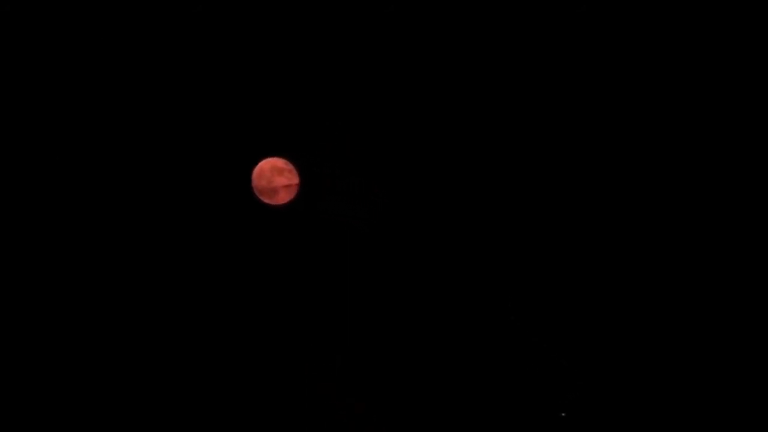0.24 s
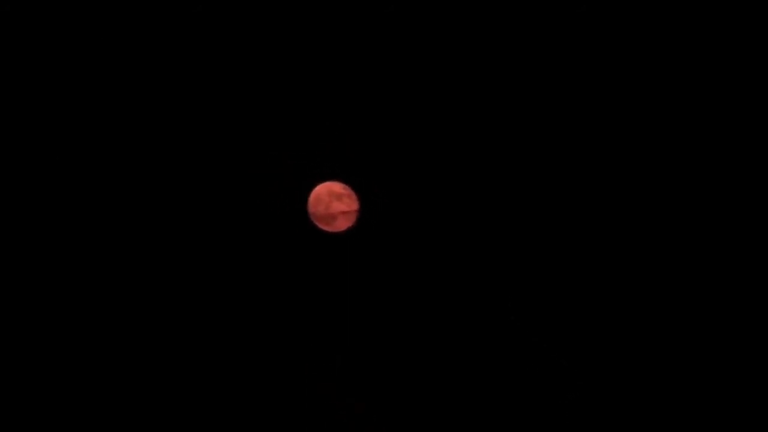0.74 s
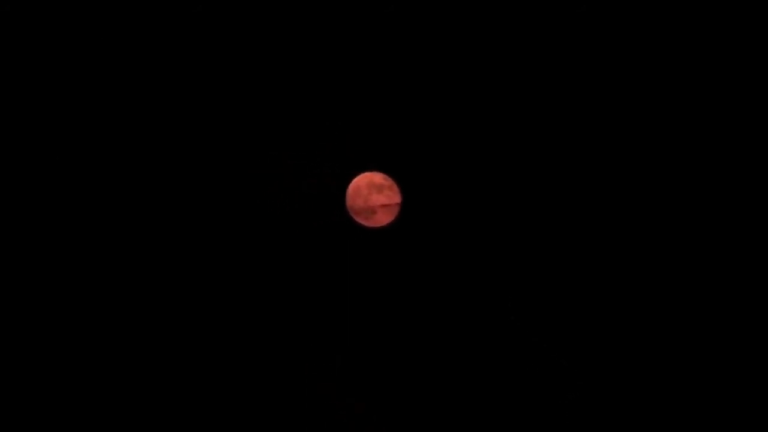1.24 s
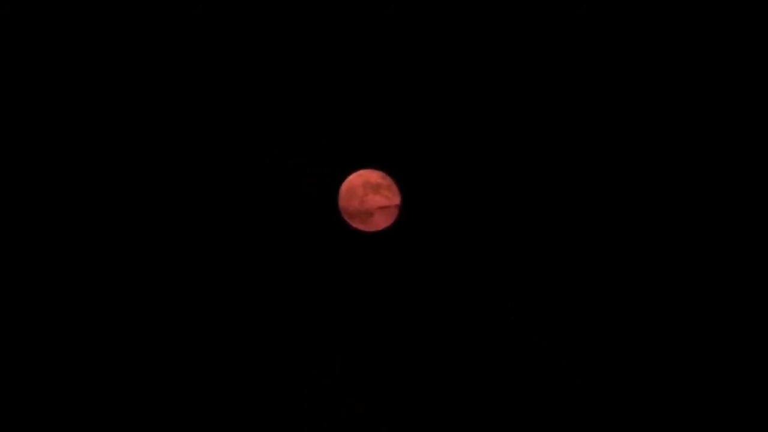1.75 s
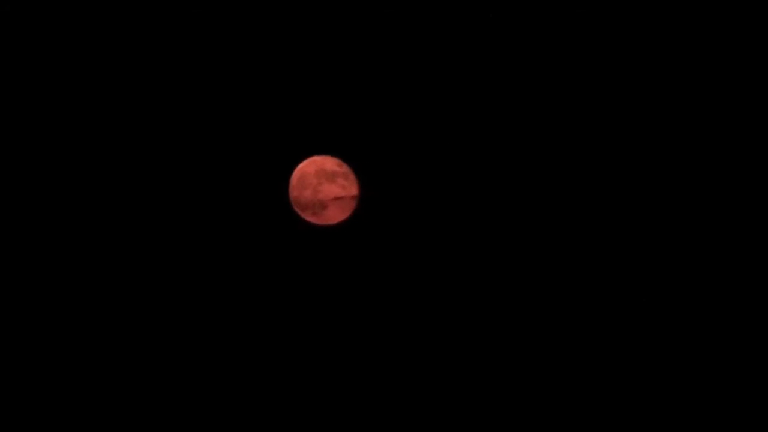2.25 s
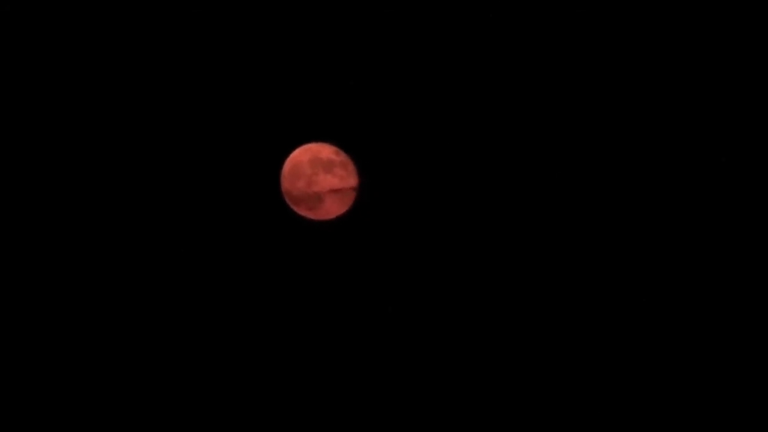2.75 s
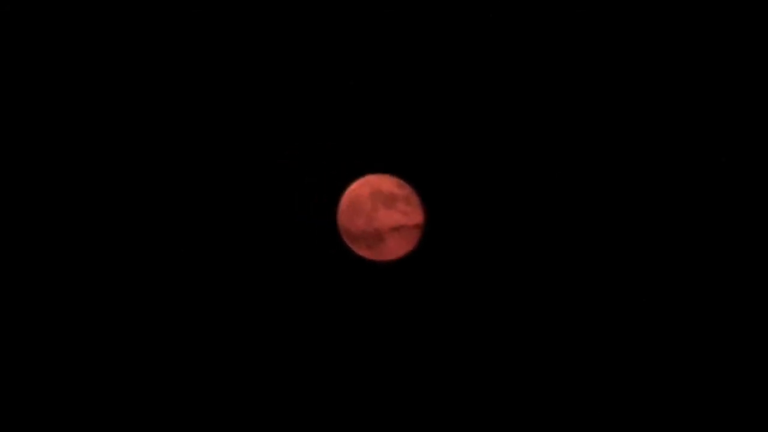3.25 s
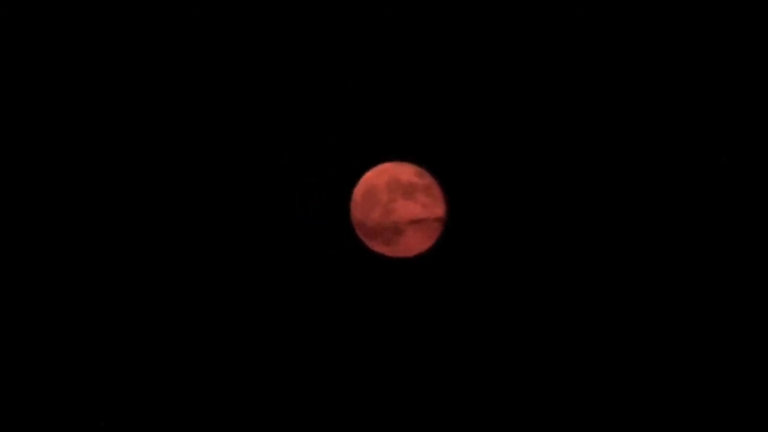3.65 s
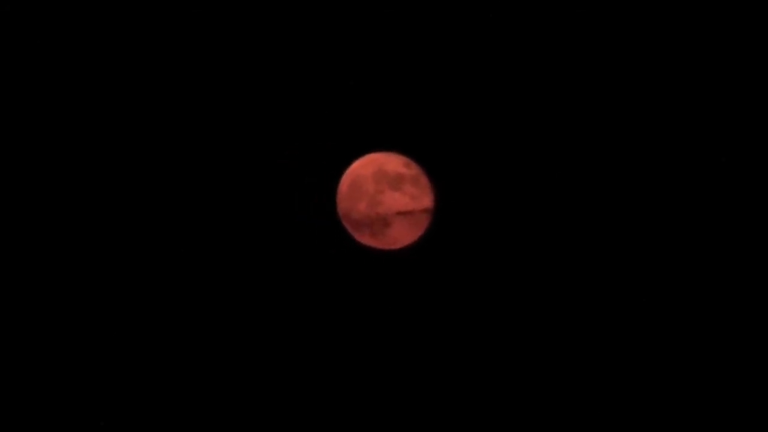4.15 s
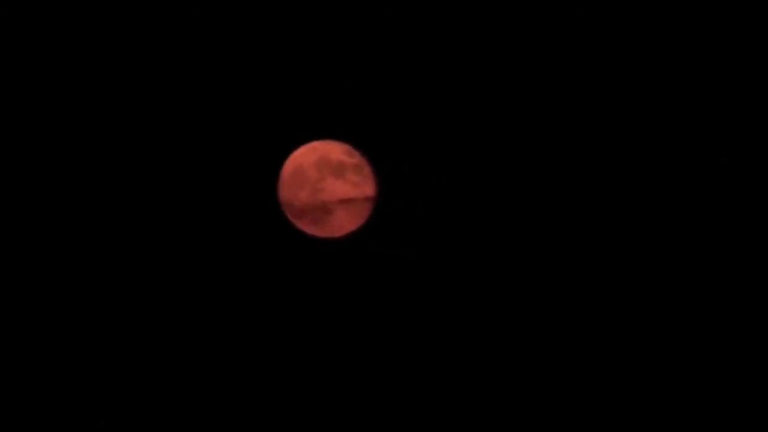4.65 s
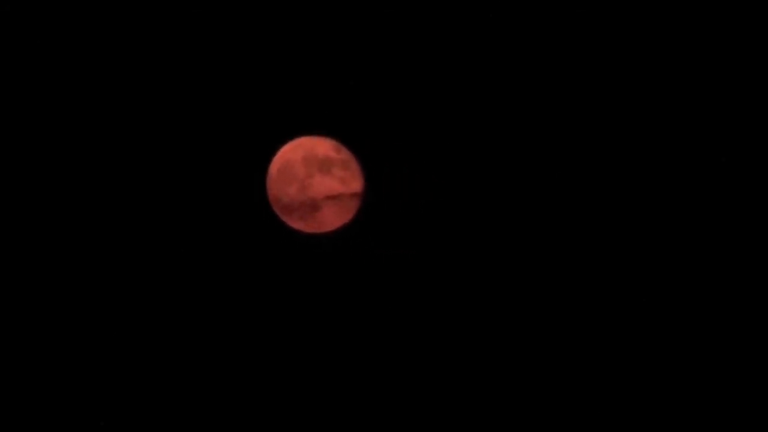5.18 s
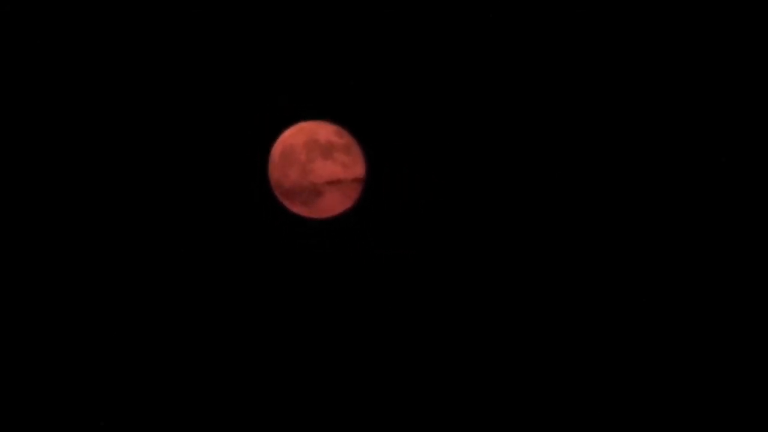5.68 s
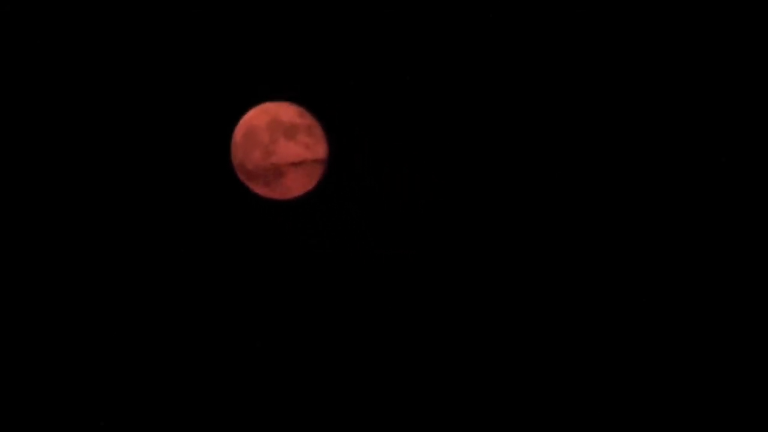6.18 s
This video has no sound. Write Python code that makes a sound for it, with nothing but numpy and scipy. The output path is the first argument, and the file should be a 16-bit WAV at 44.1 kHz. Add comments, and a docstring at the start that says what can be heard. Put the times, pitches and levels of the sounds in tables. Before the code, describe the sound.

Distant frogs chorus over a low motor hum and steady hiss by the water at night, with two sharp clicks close by near the end.

```python
"""A far chorus of frogs swells about once a second across quiet water at night. Nearer frogs rattle
in trains of chirps off to the right, and others croak low with ringing vocal sacs. A distant motor
drones in overtones of its firing rate, over a low rush of air and the hiss of the microphone pair.
Right at the microphones, small blows ring the camera's casing: it ticks faintly, then clicks twice."""
import sys
import numpy as np
from scipy import signal
from scipy.fft import rfft, irfft
from scipy.io import wavfile

SR = 44100
rng = np.random.default_rng(int(sys.argv[2]) if len(sys.argv) > 2 else 0)


def generate_wav(sig):
    """Save sig (samples, or channels by samples) to the path in sys.argv[1] as 16-bit PCM at SR."""
    pcm = np.round(np.clip(np.atleast_2d(sig).T, -1, 1) * 32767).astype(np.int16)
    wavfile.write(sys.argv[1], SR, pcm)


N = 283122
T = np.arange(N) / SR


def chorus(high_db=-61.5, low_db=-61.0, surge_s=0.28):
    """Far frogs across the water: a high band on the right and a weaker, low band swell together."""
    # the frogs egg each other on: (time of the peak [s], rise [dB])
    surges = [(0.05, 2.5), (1.0, 3.5), (2.2, 5), (3.22, 8), (4.65, 4.5), (5.8, 6.5)]
    swell_db = sum(db * bell(T - s, surge_s) for s, db in surges)
    low_swell_db = .25 * (swell_db - swell_db.mean())
    high = frog_crowd(hz=2000, spread=.055, pulse_s=.0028, count=1800)
    low = frog_crowd(hz=1190, spread=.04, pulse_s=.004, count=450)
    return panned(amp(high_db + swell_db) * high, left_db=-4) + amp(low_db + low_swell_db) * low


def frog_crowd(hz, spread, pulse_s, count, uneven_db=0.1):
    """Pips from many far frogs overlap, each with its own pitch, loudness and bearing."""
    mid, side = np.zeros((2, N))
    t = np.arange(-SR // 50, SR // 50) / SR
    for k, (delay, pitch, loudness, bearing) in enumerate(rng.standard_normal((count, 4))):
        pip_hz = hz * np.exp(spread * pitch)
        pip = amp(uneven_db * loudness) * bell(t, pulse_s) * np.sin(2 * np.pi * pip_hz * t)
        s = (k + delay / 2) / count * T[-1] + t[0]
        add(mid, s, pip)
        add(side, s, bearing * pip)
    return unit_rms(diffuse(mid, side))


def rattles(chirps_per_s=22.8, chirp_s=.0056, sweep_per_s=11.5, octave_db=-24):
    """Nearer frogs, right of the microphones: each rattle is a train of short upward chirps."""
    # (time of the first chirp [s], length [s], level [dB], pitch [Hz])
    calls = [(0.039, .285, -46.5, 1920), (1.464, .24, -48.5, 1892), (2.039, .29, -55, 1990),
             (3.006, .45, -54, 2002), (3.195, .42, -53.5, 1990), (5.217, .24, -45.5, 1960),
             (5.80, .33, -54, 1976)]
    out = np.zeros(N)
    for s, length, db, hz in calls:
        count = max(int(length * chirps_per_s) + 1, 2)
        t = T[:int(count * SR / chirps_per_s)]
        from_peak = (t * chirps_per_s % 1 - .5) / chirps_per_s
        phase = 2 * np.pi * hz * (from_peak + sweep_per_s * from_peak ** 2 / 2)
        tone = np.sin(phase) + amp(octave_db) * np.sin(2 * phase)
        add(out, s - .5 / chirps_per_s, amp(db) * bell(from_peak, chirp_s) * tone)
    return panned(banks(out, wet_db=-12), left_db=-4)


def croaks(pulses_per_s=115):
    """Low croaks, straight ahead: a vocal sac rings at a sliding pitch, roughened by uneven pulses."""
    # (time [s], length [s], level [dB], start pitch [Hz], end pitch [Hz])
    calls = [(0.101, 0.063, -54, 779, 983), (.19, .045, -54, 1086, 1115), (1.38, .13, -56, 819, 899),
             (1.826, 0.059, -53.5, 853, 993), (1.894, 0.077, -54, 970, 837), (3.077, 0.13, -57, 830, 912),
             (3.529, 0.0795, -56, 877, 1052), (4.46, 0.081, -55.5, 950, 1013),
             (4.58, 0.076, -57, 1110, 1037)]
    out = np.zeros(N)
    for s, length, db, start_hz, end_hz in calls:
        size = int(length * SR)
        unsteady = wander(rate_hz=120)[:size]
        pulse_cycles = np.cumsum(pulses_per_s * (1 + 0.28 * unsteady)) / SR
        hz = np.linspace(start_hz, end_hz, size) * (1 + .08 * unsteady[::-1])
        sac = np.sin(2 * np.pi * np.cumsum(hz) / SR)
        croak = unit_rms(sac * (1 + np.cos(2 * np.pi * pulse_cycles)))
        add(out, s, amp(db) * croak * signal.windows.hann(size) ** .5)
    return banks(out, wet_db=-3)


def casing_clicks(crack_t60=0.02, snap_t60=0.0042, rise_s=0.00038, skew_rad=0.14):
    """Right at the microphones, each blow gives a snap and a brief crackle and rings the casing."""
    # (time [s], gain [dB], place struck [0 = hollow panel, 1 = stiff edge], soft-contact cutoff [Hz])
    blows = [(2.8147, -30.5, 0.62, 14000), (3.8084, -22, 1, 2000), (4.6402, -35, 0.42, 5000),
             (5.4935, -21.5, 0.76, 9000), (5.5067, -6, 0.065, 18000), (5.5675, -27, 1, 3000),
             (5.578, -20.5, 1, 5000), (5.5887, -24, 0.74, 6000), (5.593, -19.5, 0.73, 6000),
             (5.599, -14, 0.55, 6000), (5.6036, -12, 0.95, 5000), (5.6048, 0.5, 0.9, 16000)]
    # the casing's modes: (frequency [Hz], t60 [s], gain from the panel [dB], gain from the edge [dB])
    modes = [(586, 0.061, -22, -48), (1050, 0.032, -11.5, -29), (1148, .04, -44, -19.5),
             (1280, 0.027, -32, -18), (1460, 0.017, -33, -20), (1652, .065, -34, -22),
             (1720, 0.023, -17, -18), (1840, 0.051, -31, -25.5), (2110, 0.039, -44, -25.5),
             (2272, 0.019, -14, -41), (2370, 0.079, -40, -33), (2769, 0.014, -30, -32),
             (3100, 0.0083, -4.5, -14), (3370, 0.013, -17, -23), (3840, 0.015, -13, -16),
             (4240, 0.012, -9.5, -25), (5270, 0.011, -21, -23), (5670, 0.016, -29, -23),
             (6120, 0.016, -37, -22.5), (7240, 0.008, -20, -25), (9260, 0.0063, -18, -26),
             (11400, 0.0066, -29, -29)]
    # the crack of a blow: (frequency [Hz], relative density [dB])
    crack_spectrum = [(100, -45), (850, -29), (1300, 6), (2700, 1.5), (4200, 0.5), (4800, -13),
                      (6000, -7.5), (8300, -16), (11000, -11), (16000, -28)]
    out, t = np.zeros((2, N)), T[:SR // 5]
    attack = 1 - np.exp(-t / rise_s)
    for s, db, place, soft_hz in blows:
        burst = amp(-16 - 60 * t / crack_t60) + place * amp(-8 - 60 * t / snap_t60)
        crack_mid, crack_side = noise(crack_spectrum, len(t)), noise(crack_spectrum, len(t))
        soft_pole = np.exp(-2 * np.pi * soft_hz / SR)
        # so small a body gives off no bass, least of all from its edge
        low_cut_hz = np.interp(place, [0, 1], [480, 1040])
        no_bass = signal.butter(4, low_cut_hz, "high", fs=SR, output="sos")
        for channel, sign in enumerate((1, -1)):
            ring = np.zeros(len(t))
            for k, (hz, t60, panel_db, edge_db) in enumerate(modes):
                decay = amp(panel_db + place * (edge_db - panel_db) - 60 * t / t60)
                # each mode reaches the two microphones slightly out of phase
                ring += decay * np.sin(2 * np.pi * hz * t + (-1) ** k * sign * skew_rad)
            blow = attack * (ring + burst * (crack_mid + 0.13 * sign * crack_side))
            dulled = signal.lfilter([1 - soft_pole], [1, -soft_pole], blow)
            add(out[channel], s, amp(db) * signal.sosfilt(no_bass, dulled))
    return panned(out, left_db=-0.3) + amp(-22) * reflections(out.mean(0), t60=0.12)


def motor(scattered_db=-58.5, fading_db=3, whine_peak_s=3.66, whine_fade_s=.7):
    """A distant motor: its second harmonic dominates and flutters; weaker overtones fade separately."""
    # the motor slowly and unevenly loses speed: (time [s], firing rate [Hz])
    speed = [(0.0, 100.9), (0.7, 97.4), (1.09, 96.95), (1.81, 96.7), (2.59, 99.06), (3.2, 97.74),
             (4.09, 98.4), (5.02, 96.6), (6.35, 95.04), (6.42, 95.9)]
    # how strongly it carries over the distance: (time [s], level [dB])
    carry = [(0.0, -53), (0.53, -51), (0.59, -56), (0.86, -45), (1.32, -54), (1.47, -45), (1.72, -53.5),
             (1.88, -46), (2.07, -55.5), (2.14, -46), (3.15, -48), (3.29, -43.5), (3.57, -47.5),
             (4.67, -43), (4.81, -49), (5.43, -41), (5.56, -47), (6.42, -49.5)]
    # (frequency [multiple of the firing rate], relative level [dB])
    partials = [(1, -21.5), (2.5, -19), (3, -18), (4, -18.5), (5, -21), (6, -15)]
    phase = 2 * np.pi * np.cumsum(curve(speed)) / SR
    level_db = curve(carry)
    # part of the exhaust note is scattered on the way and beats with the direct sound
    scattered = wander(rate_hz=8.5) * np.sin(2 * phase) + wander(rate_hz=8.5) * np.cos(2 * phase)
    drone = amp(level_db) * np.sin(2 * phase) + amp(scattered_db) * scattered / np.sqrt(2)
    # the seventh harmonic swells once and dies away
    whine_db = -68 + 11 * np.exp(-abs(T - whine_peak_s) / whine_fade_s)
    whine = amp(whine_db) * np.sin(7 * phase)
    overtones = np.zeros(N)
    for multiple, db in partials:
        gain = amp(db + fading_db * wander(rate_hz=12))
        overtones += gain * np.sin(multiple * phase + 2 * np.pi * rng.random())
    overtone_gain = amp(-49 + 0.34 * (level_db - level_db.mean()))
    return np.sqrt(2) * (drone + whine + overtone_gain * overtones)


def air_and_hiss(air_db=-52.5, hiss_db=-57.5):
    """A low rush of night air from all around, under the microphones' steady hiss."""
    # spectra of the air and the hiss: (frequency [Hz], relative density [dB])
    air_spectrum = [(15, -28), (35, -8.5), (62, 0.5), (110, 0.5), (200, -1), (400, -4), (700, -6),
                    (1000, -5), (1300, -8.5), (1600, -12), (2400, -12), (3000, -23.5), (6000, -39),
                    (16000, -50)]
    hiss_spectrum = [(100, -5.5), (2500, 0), (3200, 1), (3500, 5.5), (3950, 3), (4400, -0.5), (5600, 1),
                     (6100, -1), (8000, -3), (10600, -4), (12500, -7), (16000, -8)]
    air = diffuse(noise(air_spectrum), noise(air_spectrum))
    hiss = diffuse(noise(hiss_spectrum), noise(hiss_spectrum))
    return amp(air_db) * air + amp(hiss_db) * hiss


def banks(x, wet_db, t60=.25):
    """Direct sound plus its reflections from the banks."""
    return x + amp(wet_db) * diffuse(reflections(x, t60), reflections(x, t60))


def reflections(x, t60):
    """Spreads a sound into a dying tail of random reflections."""
    t = T[:SR // 2]
    tail = rng.standard_normal(len(t)) * amp(-60 * t / t60)
    return signal.fftconvolve(x, tail / np.linalg.norm(tail))[:N]


def diffuse(mid, side):
    """Sound from all around, reaching two closely spaced microphones."""
    # stereo width at the pair: (frequency [Hz], side gain [dB])
    width = [(60, -33), (120, -36), (200, -29), (380, -10), (700, -9.5), (1300, -11), (2400, -9),
             (4400, -13), (8100, -26), (15000, -64)]
    side = shaped(side, width)
    return np.array([mid + side, mid - side])


def panned(x, left_db):
    """Sets the left channel against the right; negative left_db moves the sound right."""
    return x * amp([[left_db / 2], [-left_db / 2]])


def shaped(x, spectrum):
    """Filters by (frequency [Hz], gain [dB]) points joined on a log-frequency axis."""
    hz, db = np.transpose(spectrum)
    bins_hz = np.fft.rfftfreq(len(x), 1 / SR)
    gain = amp(np.interp(np.log(bins_hz + 1), np.log(hz + 1), db))
    return irfft(rfft(x) * gain, len(x))


def noise(spectrum, size=N):
    """Noise of rms 1 with the given spectrum."""
    return unit_rms(shaped(rng.standard_normal(size), spectrum))


def wander(rate_hz):
    """Random drift of rms 1, rolling off above rate_hz."""
    hz = np.fft.rfftfreq(N, 1 / SR)
    return unit_rms(irfft(rfft(rng.standard_normal(N)) * np.exp(-(hz / rate_hz) ** 2), N))


def bell(t, sigma):
    """Gaussian swell, peaking at t = 0."""
    return np.exp(-.5 * (t / sigma) ** 2)


def curve(rows):
    """Joins (time [s], value) rows by straight lines."""
    return np.interp(T, *np.transpose(rows))


def add(mix, s, sound):
    """Mixes a sound in at time s."""
    start = round(s * SR)
    sound = sound[max(-start, 0):]
    part = mix[max(start, 0):][:len(sound)]
    part += sound[:len(part)]


def amp(db):
    """Decibels to gain."""
    return 10 ** (np.asarray(db) / 20)


def unit_rms(x):
    """Scales to rms 1."""
    return x / np.sqrt(np.mean(x ** 2) + 1e-20)


def scene():
    """The waterside at night, as it reaches the microphone pair."""
    return air_and_hiss() + motor() + chorus() + rattles() + croaks() + casing_clicks()


def record(dry):
    """The recorder cuts the treble above 15.8 kHz."""
    low_pass = signal.firwin(511, 15800, window=("kaiser", 9), fs=SR)
    return signal.oaconvolve(dry, low_pass[None], "same")


dry = scene()
out = record(dry)
generate_wav(out)
```